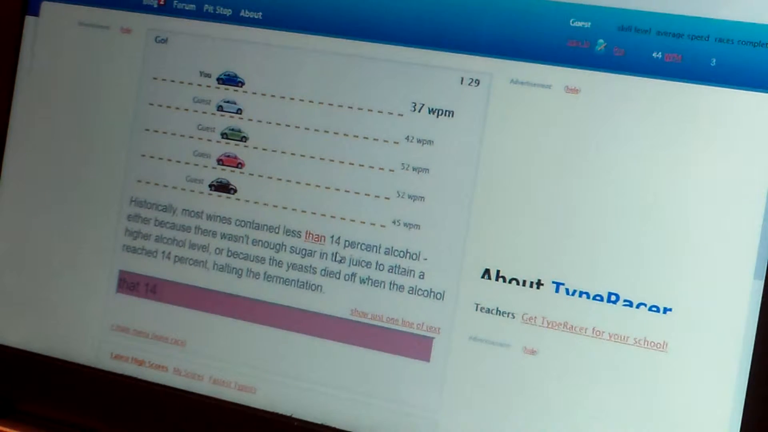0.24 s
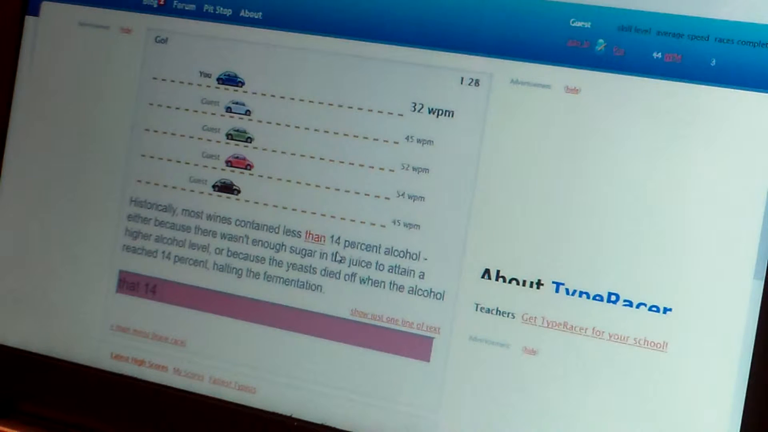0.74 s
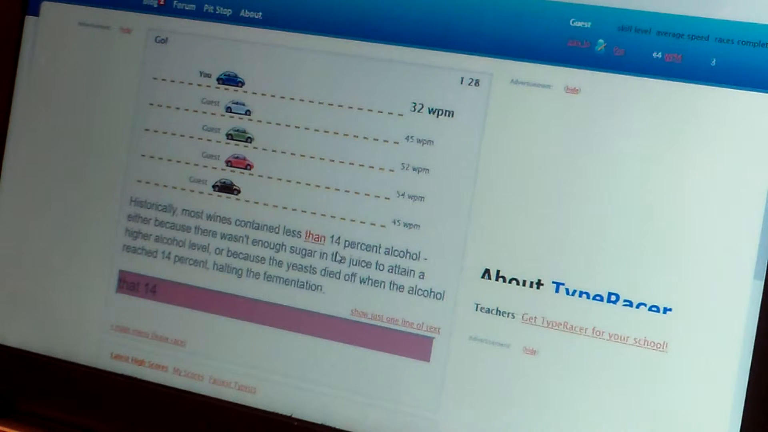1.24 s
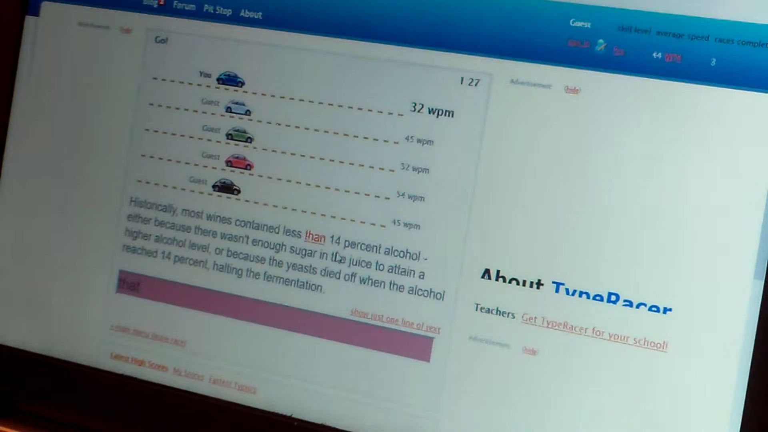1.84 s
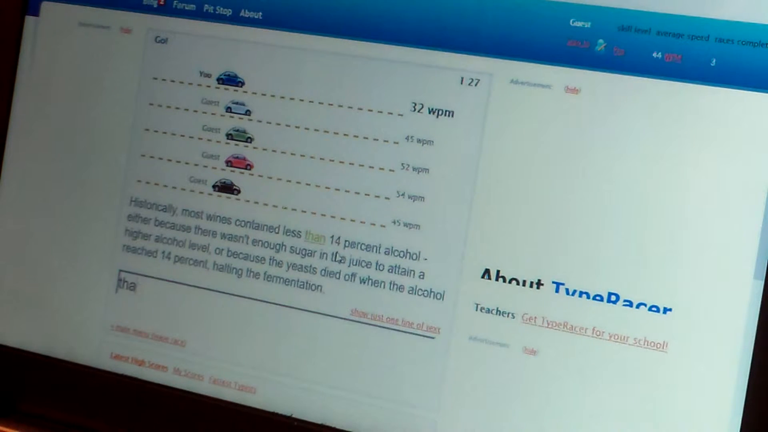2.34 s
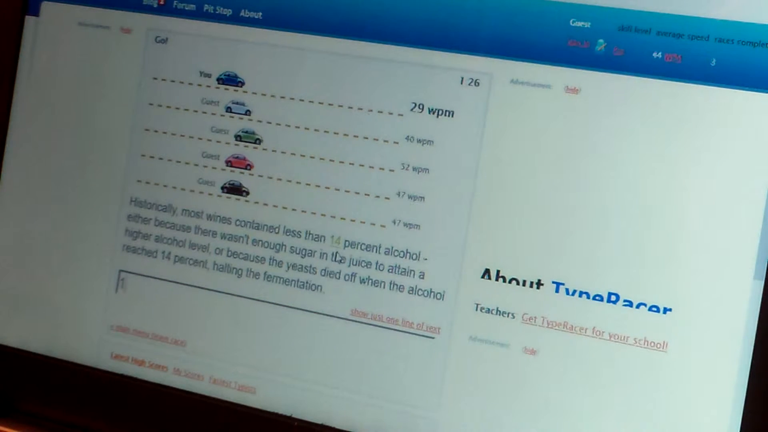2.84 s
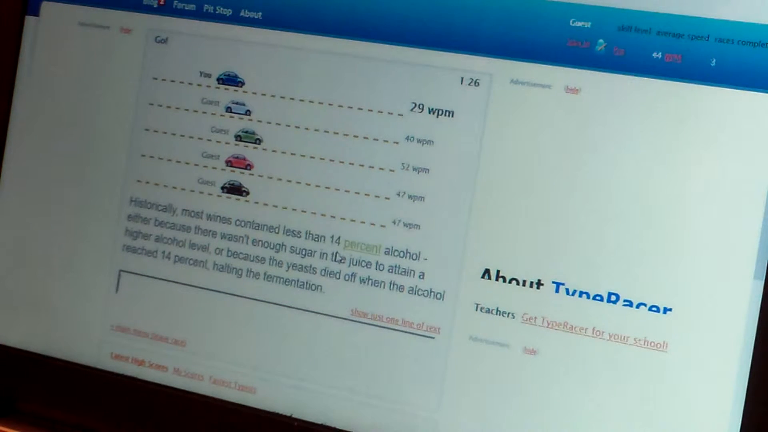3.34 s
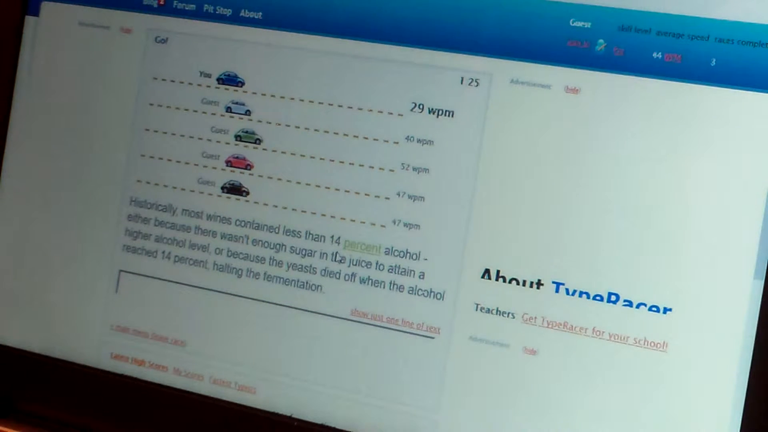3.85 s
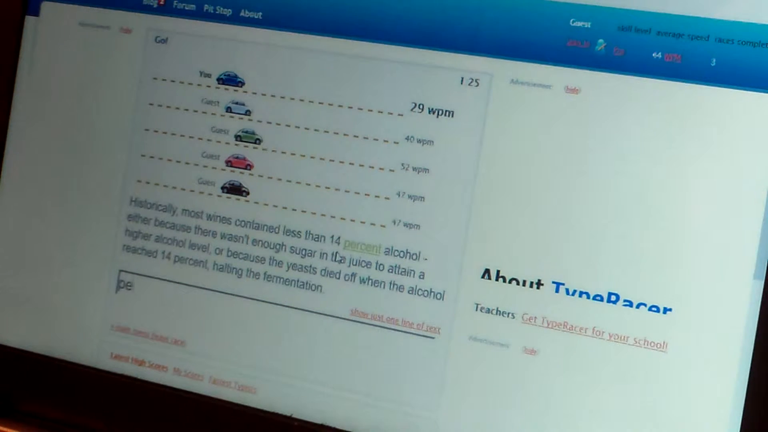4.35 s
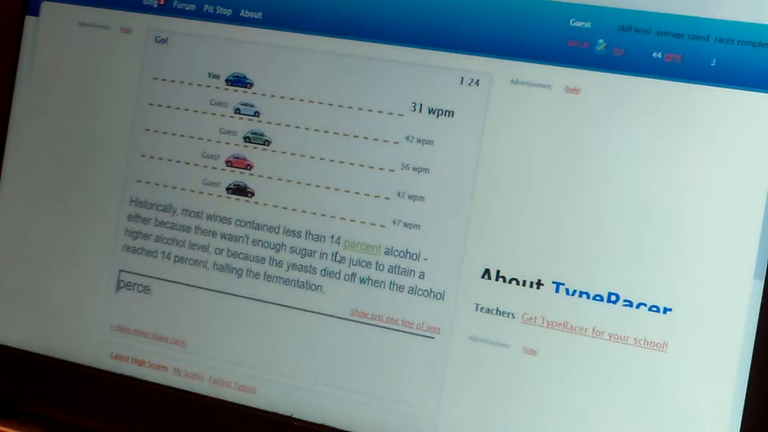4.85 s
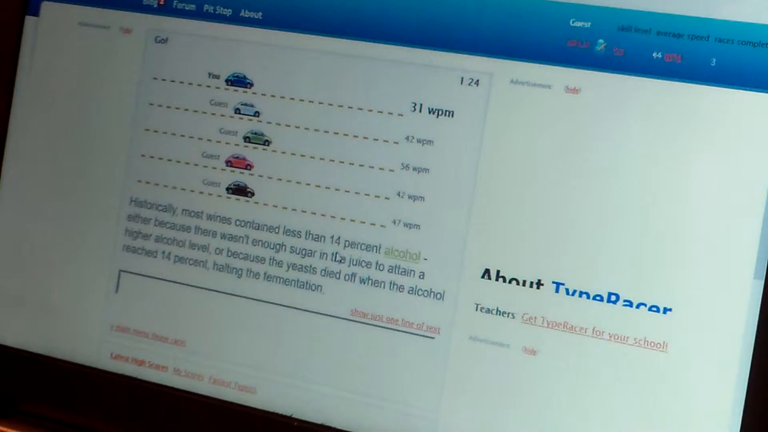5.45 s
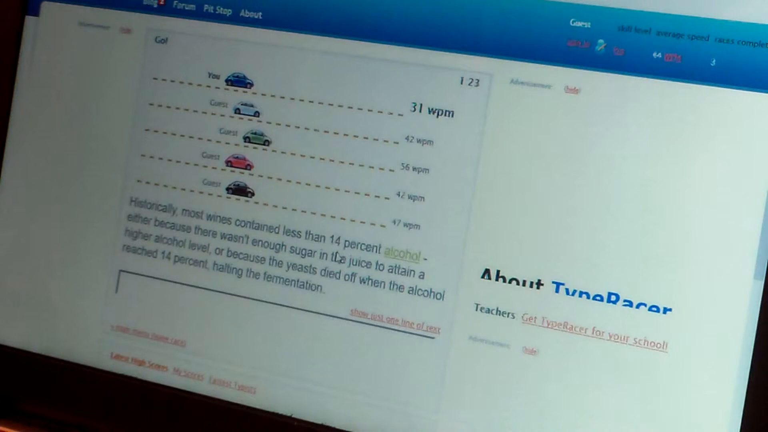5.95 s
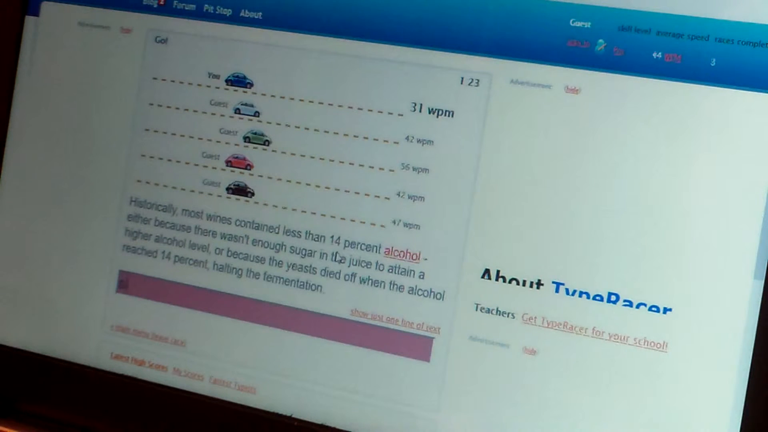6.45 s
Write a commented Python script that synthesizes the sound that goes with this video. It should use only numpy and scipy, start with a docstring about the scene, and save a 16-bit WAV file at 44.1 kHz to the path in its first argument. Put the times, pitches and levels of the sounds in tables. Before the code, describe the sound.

Someone types on a plastic computer keyboard in a quiet room, close to the microphone. Light key clicks come in uneven bursts, with a few louder clacks from the space bar, and firmer strokes send soft, low thumps through the desk. The typing starts sparse, quickens, pauses briefly past the middle, then runs again and ends with a few taps. Faint hiss and low rumble lie underneath.

```python
"""A quiet room, close to a plastic keyboard on a light desk, where fingers are typing.
Each contact of cap, stem and base is a train of tiny impacts that excites the resonances of the plastic.
Firm strokes thump into the damped modes of the desk, which keeps swaying near 47 Hz.
The walls return a short reverberation. Below lie hiss, rumble and two thin electrical whistles."""
import sys
import numpy as np
from scipy import signal
from scipy.fft import rfft, irfft
from scipy.io import wavfile
from scipy.ndimage import uniform_filter1d

SR = 44100
rng = np.random.default_rng(int(sys.argv[2]) if len(sys.argv) > 2 else 0)


def file_out(sig):
    """Save sig as 16-bit WAV at sys.argv[1]."""
    # one column per channel
    cols = np.atleast_2d(sig).T
    # limit, then scale
    lim = np.clip(cols, -1, 1)
    pcm = np.round(lim * 32767).astype(np.int16)
    wavfile.write(sys.argv[1], SR, pcm)


N = 295470

# Spectrum of the steady noise. Each row: frequency in Hz, relative spectral density in dB.
NOISE_SPECTRUM = [(12, -15), (20, 5), (30, -8.5), (45, -13), (63, -17.5), (96, -20), (143, -20),
                  (180, -27.5), (300, -30), (600, -34.5), (2000, -40), (8650, -42.5), (15400, -44.5),
                  (16100, -81)]
# Narrow low noise of the house. Each row: frequency in Hz, bandwidth in Hz, relative level in dB.
RUMBLE_BANDS = [(90.6, 10, -3.5), (131, 12, -13)]
# Electrical whistles. Each row: frequency in Hz, rms level in dB.
WHISTLE_TONES = [(8538, -75.5), (8608, -78)]

# Resonances of the keyboard's parts. Each row: frequency in Hz, bandwidth in Hz, relative level in dB.
CASE_MODES = [(586, 324, -7), (873, 277, -2.5), (1193, 580, -0.5), (1461, 587, 0.5), (1780, 940, -8.5)]
PLATE_MODES = [(1995, 196, -2.5), (2540, 278, 4), (2970, 660, -9)]
CAP_MODES = [(3534, 900, -2), (4510, 1930, 1), (5830, 2050, 0), (6625, 234, 1.5)]
STEM_MODES = [(7200, 990, -20.5), (8540, 540, -5.5), (9650, 670, -0.5), (10900, 1350, -6.5),
              (11980, 780, -11), (12600, 630, -12), (14500, 3100, -20.5)]
# Factors on a contact's base fall time, in which its rattle drops 25 dB: case, plate, cap, stem.
FALL_FACTORS = [1.66, 0.86, 0.96, 1.02]
# Contacts of the small keys. Each row: start in seconds, cap level in dB, case and stem levels
# in dB above the cap, base fall time in ms.
KEY_CONTACTS = [(0.1175, -45, -8, -8, 19), (0.1295, -47, -7, -9, 13), (0.2222, -48, 9, 0.1, 21),
                (0.2315, -56, 0, 7, 12), (0.801, -49.5, -5, 0, 20), (0.9599, -52.5, 2.5, 6.5, 16),
                (1.3264, -52, 2.5, -4, 32), (1.4657, -45, -8, -2, 27), (1.4787, -57, -8, 4, 33),
                (1.4874, -65, 13, 14, 16), (1.5672, -53.5, -5, -0.4, 24), (1.576, -58, 12, 0, 23),
                (1.6316, -42, -2, -1, 31), (1.6501, -53, 1, 11.5, 19), (1.6653, -62, 9, 9, 22),
                (1.7013, -52.5, -9, -2.5, 15), (1.719, -53, -14, -1, 29), (1.7246, -61, 12.5, -5, 32),
                (1.7504, -54.5, 5, -5, 11), (1.7764, -49, -2, -3.5, 47), (1.7977, -57.5, 2.5, 12, 5),
                (1.8654, -55, -2, 0, 21), (1.8737, -61, 13.5, -1.5, 19), (1.8875, -54, 5, -1, 20),
                (1.9528, -50.5, 3.5, 0, 41), (1.9712, -55.5, 8, 10, 6), (1.9787, -50, -10, 8, 12),
                (2.0442, -56, 4, -1, 29), (2.0757, -53, 2, -2, 25), (2.1348, -39.5, -4, -3, 22),
                (2.1507, -57, 14, 11, 2), (2.1588, -54, -1, 5, 30), (2.176, -49, -10, -9, 4),
                (2.2192, -53.5, 3, -2, 25), (2.2275, -59, 7.5, -1.5, 44), (2.242, -43.5, -3, 2, 19),
                (2.5736, -55, 0, -1.5, 47), (2.599, -58.5, 7.5, 1, 34), (2.701, -52, 1.5, 4.5, 14),
                (2.7551, -60.5, 11.5, 13, 33), (2.8723, -55, -10, 0.1, 25), (2.8925, -50, -3, 7, 30),
                (2.9843, -45, -8, -5, 14), (2.991, -54.5, -0.5, -2.5, 52), (3.1161, -52.5, -1, -3, 40),
                (3.1293, -48, 1, 0.1, 22), (3.2505, -39.5, -1, -5, 15), (3.262, -47, 6, 7, 12),
                (3.2748, -49, 0.4, 1.5, 36), (3.3455, -48.5, 8, -1, 13), (3.3545, -56, -4, 12, 8),
                (4.26, -51.5, 0, -0.5, 43), (4.2838, -53.5, 5.5, -2.5, 22), (4.39, -56, -12, -6, 28),
                (4.4052, -46, -7, -7, 24), (4.513, -53, -12, -7, 42), (4.5262, -49.5, 7.5, 0, 13),
                (4.6, -39.5, -10, -3.5, 22), (4.6123, -56.5, 10, 4, 45), (4.6227, -55, 4, 9, 25),
                (4.6797, -53, -3, 2, 39), (4.698, -50.5, 1, 4, 15), (4.8871, -41.5, -0.5, -4, 28),
                (4.907, -63, 0, 8, 30), (4.9315, -59, -15, 5, 0), (4.983, -50, 8.5, -1, 22),
                (5.0133, -60, -11, 5, 36), (5.0372, -56.5, -8, 5, 8), (5.1054, -55.5, -3, -1, 23),
                (5.124, -60, 12.5, 2.5, 16), (5.1719, -47.5, -6, -4, 40), (5.194, -57, 10.5, -1, 29),
                (5.3342, -54, 1.5, 1, 42), (5.3505, -43.5, -4, -9, 14), (5.418, -52, -5, -6, 36),
                (5.4441, -56, 18.5, 7, 8), (5.4812, -43, 4.5, 9, 34), (5.5862, -54, -11, -1.5, 30),
                (6.319, -53, -7, -7, 16), (6.3655, -53.5, -10, 0.5, 28), (6.4978, -51.5, -9, -2, 51),
                (6.513, -48, 0.3, -4, 33), (6.6214, -59, -4, 2, 55)]
# Kinds of space-bar contact. Each: case, plate, cap and stem levels in dB, base fall time in ms.
TICK_TIMBRE = (-39.5, -43.5, -25.5, -16, 14)
BOTTOM_TIMBRE = (-32, -25, -23.5, -31.5, 10)
RETURN_TIMBRE = (-33, -36.5, -34, -32.5, 29)
BOUNCE_TIMBRE = (-50, -61, -51, -58, 35)
# Space-bar contacts. Each row: start in seconds, level in dB added to the timbre of its kind.
BAR_TICKS = [(0.3083, 1.5), (2.7255, -4.5), (3.3785, 0), (5.4634, -3)]
BAR_BOTTOMS = [(0.3152, 0.22), (3.3867, 0.37), (5.4729, 0.7)]
BAR_RETURNS = [(0.4541, -4), (2.8802, 2), (3.533, 1.8), (5.5944, 2.5)]
# Reverberation of the room. Each row: frequency in Hz, 60 dB decay time in seconds.
ROOM_DECAY = [(300, 0.34), (1000, 0.33), (4000, 0.22), (12000, 0.2)]

# Swings of the desk, each set off by a stroke. Each row: start in seconds, frequency in Hz,
# rms level in dB before decay, seconds until the hands damp it.
DESK_SWINGS = [(0.135, 49.06, -40, 0.07), (0.25, 48.4, -40, 0.034), (0.335, 49, -34.5, 0.1),
               (0.47, 46.6, -39.5, 0.11), (0.82, 47.6, -42.5, 0.095), (1.345, 47.6, -39, 0.091),
               (1.51, 47.3, -33.5, 0.15), (1.69, 46.2, -33.5, 0.053), (1.81, 46.7, -33, 0.087),
               (2.0, 47.3, -34.5, 0.13), (2.17, 50.3, -35, 0.11), (2.6, 45.7, -35, 0.17),
               (2.77, 45.9, -36, 0.28), (3.17, 49.3, -44.5, 0.083), (3.28, 48.25, -36.5, 0.24),
               (3.58, 49.9, -47, 0.19), (4.26, 47, -37, 0.24), (4.43, 47.5, -34, 0.12),
               (4.61, 45.77, -39, 0.13), (4.9, 47.7, -38.5, 0.43), (5.34, 47.5, -40, 0.049),
               (5.5, 45.5, -35, 0.063), (5.64, 48.2, -41, 0.081), (6.36, 45.4, -48, 0.14),
               (6.54, 47.6, -36, 0.2)]
# Strokes that reach the desk. Each row: start in seconds, drive in dB of deep, middle and upper modes.
DESK_STROKES = [(0.215, -42, -37.5, -55), (0.313, -38, -27, -30.5), (0.387, -59, -40, -41),
                (0.806, -48, -45, -66), (1.336, -46, -46, -63), (1.385, -57, -46, -63),
                (1.489, -36, -36, -46), (1.573, -55, -41, -52.5), (1.642, -37, -28.5, -39),
                (1.73, -46, -49, -50), (1.794, -35, -31.5, -42.5), (1.871, -37, -46, -50.5),
                (1.963, -38, -29, -38.5), (2.042, -39, -52, -57), (2.143, -32, -25.5, -43),
                (2.224, -44, -40.5, -59), (2.594, -43, -38.5, -52), (2.74, -54, -39.5, -42),
                (2.778, -61, -41, -48), (2.883, -61, -38.5, -33), (2.993, -35.5, -38, -50),
                (3.043, -59, -47, -59), (3.12, -38.5, -41.5, -48), (3.249, -33, -31.5, -43),
                (3.339, -51, -38, -45), (3.386, -34, -27.5, -32), (3.522, -59, -44, -41),
                (4.274, -40, -43, -40.5), (4.438, -43, -41, -49), (4.518, -35, -43, -45),
                (4.604, -30, -37.5, -43), (4.71, -39, -48, -54), (4.903, -33, -59, -44),
                (4.985, -59, -54, -49), (5.018, -51, -40, -49), (5.109, -52, -38, -42.5),
                (5.171, -52, -39.5, -46), (5.435, -42, -39, -42.5), (5.475, -32, -25.5, -32),
                (5.585, -41, -51, -44), (5.616, -52, -43, -40.5), (5.719, -52, -49, -70),
                (6.304, -40.5, -55, -64), (6.368, -42, -58, -60), (6.502, -40, -40.5, -43)]
# Modes of the desk. Each row: frequency in Hz, relative level in dB, 60 dB decay time in seconds.
DEEP_MODES = [(97.7, -8.5, 0.41), (113.6, -3, 0.14)]
MIDDLE_MODES = [(141.5, -1.25, 0.2), (172, -4, 0.18)]
UPPER_MODES = [(233, -4, 0.22), (270, -10, 0.23), (317, -5, 0.069)]
TOP_MODES = [(371, 5.5, 0.13), (420.3, 9.5, 0.19), (475, 5.5, 0.089)]


def from_db(db):
    """Amplitude grows tenfold with every 20 dB."""
    return 10 ** (np.asarray(db) / 20)


def rms_one(x):
    """Normalisation to unit mean power."""
    return x / np.sqrt(np.mean(x ** 2) + 1e-20)


def at_hz(points, hz):
    """Interpolation on a logarithmic frequency axis."""
    frequencies, values = np.transpose(points)
    return np.interp(np.log(hz), np.log(frequencies), values)


def resonance(x, hz, width_hz):
    """Forced response of a damped resonator with unit peak gain."""
    r = np.exp(-np.pi * width_hz / SR)
    feedback = [1, -2 * r * np.cos(2 * np.pi * hz / SR), r * r]
    return signal.lfilter(np.array([1, 0, -1]) * (1 - r * r) / 2, feedback, x + 1e-18)


def resonances(drives, modes):
    """Superposition of modes in alternating sign, one drive each, scaled to a unit-energy impulse response."""
    response = impulse_response = 0
    for k, (drive, (hz, width_hz, db)) in enumerate(zip(drives, modes)):
        gain = (-1) ** k * from_db(db)
        response += gain * resonance(drive, hz, width_hz)
        impulse_response += gain * resonance(signal.unit_impulse(SR // 2), hz, width_hz)
    return response / np.sqrt(np.sum(impulse_response ** 2))


def background(noise_db=-45, rumble_db=-63.5):
    """Stationary sound: broadband noise, narrowband rumble and two pure electrical tones add up."""
    bins_hz = np.maximum(np.fft.rfftfreq(N, 1 / SR), 1)
    noise = irfft(rfft(rng.standard_normal(N)) * from_db(at_hz(NOISE_SPECTRUM, bins_hz)), N)
    rumble = resonances([rng.standard_normal(N)] * len(RUMBLE_BANDS), RUMBLE_BANDS)
    t = np.arange(N) / SR
    whistles = sum(np.sqrt(2) * from_db(db) * np.sin(2 * np.pi * hz * t) for hz, db in WHISTLE_TONES)
    return from_db(noise_db) * rms_one(noise) + from_db(rumble_db) * rumble + whistles


def key_contacts(plate_over_cap_db=-1, settle_s=0.016, settle_under_db=18, settle_fall_ms=30):
    """Mechanical play: a small key strikes, then its loose cap touches once more, softly."""
    rows = []
    for start_s, cap_db, case_over_db, stem_over_db, fall_ms in KEY_CONTACTS:
        levels_db = cap_db + np.array([case_over_db, plate_over_cap_db, 0, stem_over_db])
        settle_db = levels_db - settle_under_db + rng.normal(0, 3, 4)
        delay_s = settle_s * rng.lognormal(0, 0.4)
        rows += [(start_s, levels_db, fall_ms), (start_s + delay_s, settle_db, settle_fall_ms)]
    return rows


def contact_force(ms, levels_db, fall_ms, knocks_per_s=9000, spread_db=3, closing_ms=0.27, slide_ms=10.5):
    """Friction, then impact: the stem scuffs its guide and a dying rattle follows; one row per part."""
    levels_db = np.c_[levels_db]
    knocks = rng.random(len(ms)) < knocks_per_s / SR
    sizes = from_db(spread_db * np.minimum(rng.exponential(1, len(ms)), 4))
    grains = rms_one(knocks * sizes * rng.choice([-1, 1], len(ms)))
    onset = np.searchsorted(ms, 0)
    grains[onset + round(0.7 * SR / 1000)] = 5.8   # the first firm touch, 0.7 ms in
    decay = from_db(-25 * ms / (max(fall_ms, 2) * np.c_[FALL_FACTORS]))
    rattle = grains * decay * np.clip(ms / closing_ms, 0, 1)
    head = rattle[:, onset:onset + SR // 200]   # levels are those of the first 5 ms
    rattle /= np.sqrt(np.mean(head ** 2, axis=1, keepdims=True))
    scuff = grains * np.clip(1 + ms / slide_ms, 0, 1) * (ms < 0)
    scuff_db = np.minimum(levels_db - 9, -60.5)   # faint even before a hard stroke
    return from_db(levels_db) * rattle + from_db(scuff_db) * scuff


def keyboard(contacts, colour_spread_db=1.07):
    """Modal excitation: contacts drive case, plate, cap and stem; gives direct and wall-bound sound."""
    parts = (CASE_MODES, PLATE_MODES, CAP_MODES, STEM_MODES)
    lead, length = SR // 50, SR // 8
    ms = 1000 * np.arange(-lead, length) / SR
    part_of_mode = np.repeat(np.arange(len(parts)), [len(modes) for modes in parts])
    drive = np.zeros((len(part_of_mode), 2, N + lead + length))
    for start_s, levels_db, fall_ms in contacts:
        force = contact_force(ms, levels_db, fall_ms)[part_of_mode]
        colour_db = rng.normal(0, colour_spread_db, (len(force), 1))   # each key excites modes differently
        at = round(start_s * SR)
        drive[:, 0, at:at + len(ms)] += from_db(colour_db) * force
        # The walls gather all directions, so chance colour evens out: one knock of the same energy.
        drive[:, 1, at + lead] += np.sqrt(np.sum(force ** 2, axis=1))
    return sum(resonances(drive[part_of_mode == k, :, lead:lead + N], modes)
               for k, modes in enumerate(parts))


def room(x, level_db=-10.5, gap_s=0.0031):
    """Diffuse reverberation: octave bands of noise, each decaying exponentially at its own rate."""
    t, tail = np.arange(SR // 2) / SR, 0
    for low_hz in 180 * 2.0 ** np.arange(7):
        band = signal.butter(2, [low_hz, min(2 * low_hz, .45 * SR)], "band", fs=SR, output="sos")
        t60 = at_hz(ROOM_DECAY, np.sqrt(2) * low_hz)
        tail += signal.sosfilt(band, rng.standard_normal(len(t))) * from_db(-60 * t / t60)
    tail *= np.clip(t / gap_s - 1, 0, 1)
    return from_db(level_db) * signal.fftconvolve(x, tail / np.sqrt(np.sum(tail ** 2)))[:N]


def desk_sway(rise_s=0.038, sag_db_per_s=12.5, hand_db_per_s=167):
    """Damped oscillation of the lowest desk mode: swings rise, sag and are stopped; the strongest sounds."""
    start_s, hz, level_db, free_s = np.transpose(DESK_SWINGS)[:, :, None]
    hop = 40   # samples per envelope point
    grid = np.arange(0, N, hop)
    age_s = grid / SR - start_s
    loss_db = sag_db_per_s * age_s + hand_db_per_s * np.maximum(age_s - free_s, 0)
    swings = np.clip(age_s / rise_s, 0, 1) * from_db(level_db - loss_db)
    envelope = np.interp(np.arange(N), grid, swings.max(axis=0))
    pitch_hz = np.interp(np.arange(N), grid, hz[swings.argmax(axis=0), 0])
    return np.sqrt(2) * envelope * np.sin(2 * np.pi * np.cumsum(pitch_hz) / SR)


def ring(impulses, hz, t60):
    """Free vibration: a unit impulse starts a decaying sine of unit amplitude."""
    r, w = from_db(-60 / (t60 * SR)), 2 * np.pi * hz / SR
    return signal.lfilter([0, np.sin(w)], [1, -2 * r * np.cos(w), r * r], impulses + 1e-18)


def desk_thumps(push_s=0.0027, top_under_db=11, spread_db=2.7):
    """Interference: a soft push starts close modes in opposite phase, so a thump swells, then beats."""
    start_s, deep_db, middle_db, upper_db = np.transpose(DESK_STROKES)
    at, thumps = np.round(start_s * SR).astype(int), np.zeros(N)
    for drive_db, modes in ((deep_db, DEEP_MODES), (middle_db, MIDDLE_MODES),
                            (upper_db, UPPER_MODES), (upper_db - top_under_db, TOP_MODES)):
        for k, (hz, mode_db, t60) in enumerate(modes):
            position_db = rng.normal(0, spread_db, len(at))   # each stroke lands elsewhere
            impulses = np.zeros(N)
            impulses[at] = from_db(drive_db + mode_db + position_db)
            thumps += (-1) ** k * ring(impulses, hz, t60)
    push = np.hanning(round(push_s * SR))
    return signal.fftconvolve(thumps, push / push.sum())[:N]


def space_bar_contacts(bounce_s=0.03):
    """Impact and elastic rebound: the stem ticks, the bar bottoms out, springs back and bounces once."""
    bounces = [(start_s + bounce_s, db) for start_s, db in BAR_RETURNS]
    kinds = ((BAR_TICKS, TICK_TIMBRE), (BAR_BOTTOMS, BOTTOM_TIMBRE),
             (BAR_RETURNS, RETURN_TIMBRE), (bounces, BOUNCE_TIMBRE))
    rows = []
    for strokes, (*parts_db, fall_ms) in kinds:
        rows += [(start_s, db + np.array(parts_db), fall_ms) for start_s, db in strokes]
    return rows


def gain_control(x, knee_db=-31, share=0.088, attack_s=0.059, release_db_per_s=12):
    """Compression: the gain drops by a share of the held level's excess over the knee, then creeps back."""
    level_db = 10 * np.log10(uniform_filter1d(x ** 2, SR // 200) + 1e-12)
    fall_db = release_db_per_s * np.arange(N) / SR
    held_db = np.maximum.accumulate(level_db + fall_db, axis=-1) - fall_db
    cut_db = share * np.maximum(held_db - knee_db, 0)
    r = np.exp(-1 / (attack_s * SR))
    return x * from_db(-signal.lfilter([1 - r], [1, -r], cut_db))


def scene():
    """Superposition of keyboard, reverberation, desk and background in one channel."""
    direct, to_walls = keyboard(space_bar_contacts() + key_contacts())
    return (direct + room(to_walls) + desk_thumps() + desk_sway() + background())[None]


def record(dry):
    """Compression, then band limiting: a steep low-pass is 70 dB down from about 17 kHz."""
    low_pass = signal.cheby2(12, 70, 16979, fs=SR, output="sos")
    return signal.sosfilt(low_pass, gain_control(dry))


dry = scene()
out = record(dry)
file_out(out)
```